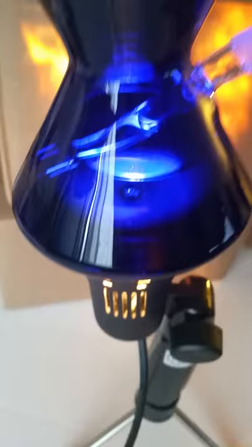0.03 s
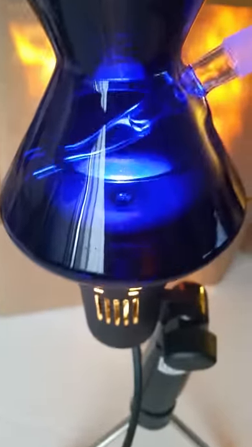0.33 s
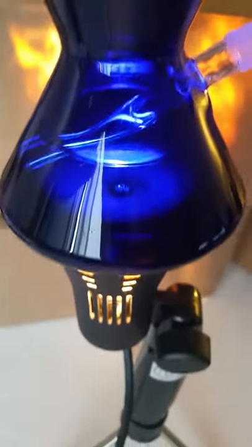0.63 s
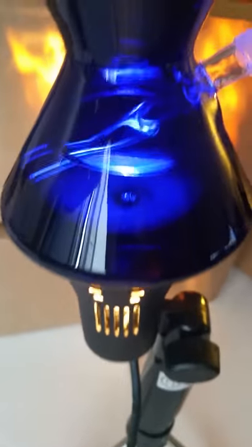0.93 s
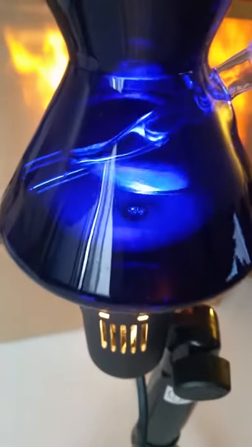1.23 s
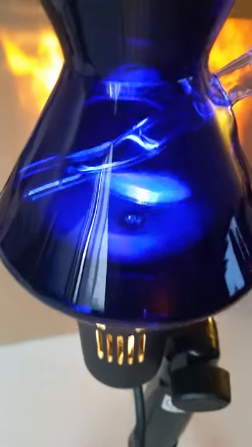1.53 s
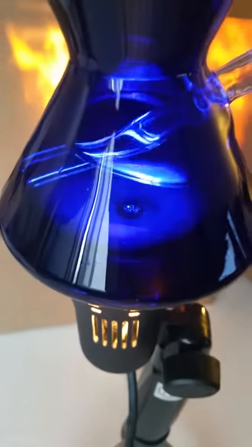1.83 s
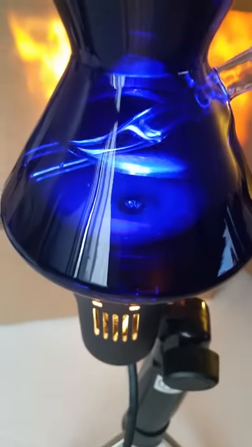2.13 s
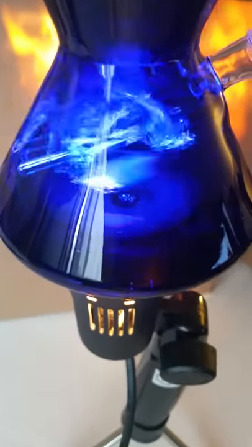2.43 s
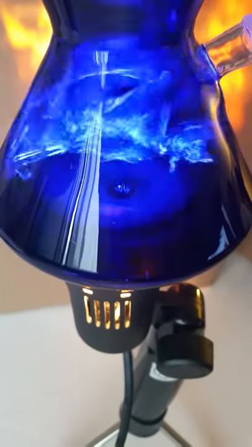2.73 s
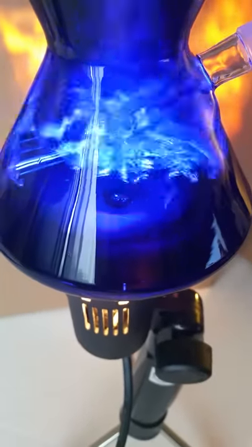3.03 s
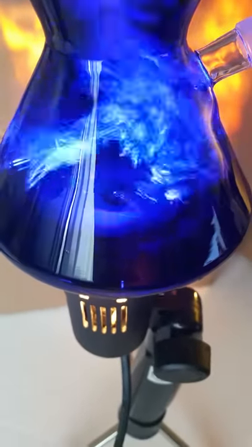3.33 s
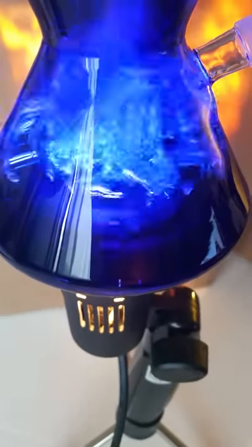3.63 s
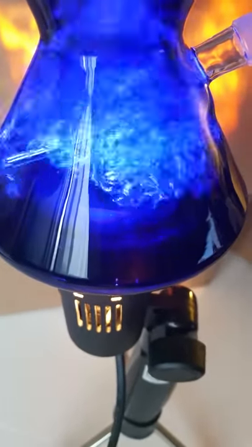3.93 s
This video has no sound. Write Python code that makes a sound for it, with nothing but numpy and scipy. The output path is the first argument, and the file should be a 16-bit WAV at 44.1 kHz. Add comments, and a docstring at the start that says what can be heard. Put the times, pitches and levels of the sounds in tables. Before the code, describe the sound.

A glass water pipe bubbles close to the microphone in a small room. For the first 2.4 seconds there is only a fan's steady low rumble and hum. Then air is drawn through the water, slightly left of centre: bubbles pop rapidly and ring the glass, larger pockets glug, and fine spray crackles. The bubbling grows fuller around 3 seconds and continues until the end at 4 seconds, the fan behind it.

```python
"""A small room with a fan rumbling and humming, a glass water pipe close to a stereo microphone.
After about two seconds air is drawn through the water: bubbles pop and ring the flask, larger pockets
glug, small bubbles churn and sing in between, and spray crackles on the glass.
The pipe sits left of centre; the fan runs behind it throughout."""
import sys
import numpy as np
from scipy import signal
from scipy.fft import rfft, irfft
from scipy.io import wavfile
from scipy.ndimage import uniform_filter1d

SR = 44100
rng = np.random.default_rng(int(sys.argv[2]) if len(sys.argv) > 2 else 0)


def bounce(signal):
    """Save signal as a 16-bit WAV file at the path given by the first command-line argument."""
    frames = np.transpose(np.atleast_2d(signal))
    limited = np.clip(frames, -1, 1)
    pcm = np.round(limited * 32767).astype(np.int16)
    wavfile.write(sys.argv[1], SR, pcm)


N = 176400
RIGHT_LAG_S = 0.00034  # the pipe's sound reaches the right channel later
DROP_RISE_CYCLES = 2.6


def undb(db):
    """Decibels to gain."""
    return 10 ** (np.asarray(db) / 20)


def unit(x):
    """Scale to an rms of 1."""
    return x / np.sqrt(np.mean(x ** 2))


def colour(x, points):
    """Filter by a curve of (freq_hz, gain_db) points."""
    hz, db = np.array(points, float).T
    freqs = np.maximum(np.fft.rfftfreq(N, 1 / SR), 1)
    return irfft(rfft(x) * undb(np.interp(np.log(freqs), np.log(hz), db)), N)


def walk(per_s):
    """A smooth random drift, rms 1."""
    hold = int(SR / per_s)
    steps = np.repeat(rng.standard_normal(N // hold + 1), hold)
    return unit(uniform_filter1d(steps, hold)[:N])


def add(track, start_s, sound):
    """Mix a sound into a track."""
    i = int(np.clip(start_s * SR, 0, N - 1))
    track[i:i + len(sound)] += sound[:N - i]


def ring(x, response):
    """Pass a sound through a left and a right impulse response."""
    return signal.fftconvolve(np.atleast_2d(x), response, axes=1)[:, :N]


def spread(x, right_db):
    """Place a sound in stereo, the right channel slightly late."""
    return np.array([x, undb(right_db) * np.roll(x, int(RIGHT_LAG_S * SR))])


def clicks(per_s, spread_db):
    """Random clicks of uneven size."""
    hits = (rng.random(N) < per_s / SR) * rng.choice([-1, 1], N)
    return hits * undb(spread_db * np.clip(rng.standard_normal(N), -2, 2))


def swarm(per_s):
    """Random bubbles as rows of start_s, pitch (0 to 1), strength (0 to 1)."""
    return rng.random((int(per_s * N / SR), 3)) * [N / SR, 1, 1]


def push(peak_s):
    """One smooth pulse of pressure, peak 1."""
    u = np.arange(SR // 100) / SR / peak_s
    return u * np.exp(1 - u)


def bubble(hz, rise_s, decay_s, glide_per_s=0.6):
    """A bubble's short ring, rising in pitch."""
    t = np.arange(int(SR * min(8 * decay_s + 3 * rise_s, .08)) + 8) / SR
    envelope = (1 - np.exp(-(t / rise_s) ** 2)) * np.exp(-t / decay_s)
    cycles = hz * t * (1 + glide_per_s * (t / 2 - decay_s))
    return -np.sin(2 * np.pi * cycles) * envelope / envelope.max()


# Bubbles popping close to the microphone, levels relative:
# start_s, level_db, pitch_hz, crack_db, rise_s, decay_s
BUBBLE_POPS = [(2.515,-30,1970,-34.5,0.001,.005), (2.587,-37,1600,-59,.006,0.026),
               (2.6438,-27,1250,-38,0.00027,.0015), (2.644,-27.5,1960,-30.5,.0005,0.0022),
               (2.691,-35,1630,-50,.0046,0.0058), (2.700,-35,2430,-55,0.0037,0.0076),
               (2.739,-19,1770,-25.5,0.00034,0.0056), (2.7394,-24.5,2740,-41,0.00027,0.0047),
               (2.773,-34,1720,-36,.002,.005), (2.796,-32,1740,-50,.003,0.0066),
               (2.822,-28.5,1720,-34,.002,.005), (2.8392,-12.5,1430,-37,0.00034,0.00043),
               (2.840,-31,1190,-30,.0005,0.0064), (2.8472,-30,1660,-34,.0003,.002),
               (2.892,-27,1720,-33,.0004,0.0049), (2.9756,-27.5,1200,-47,0.0003,.002),
               (2.9941,-21.5,1746,-33,0.0021,0.0056), (3.035,-36,2520,-50,0.0022,0.0051),
               (3.0929,-23,1780,-32,.001,.004), (3.104,-26.5,1630,-25.5,0.0019,0.0034),
               (3.187,-32,1630,-49,.0089,0.0093), (3.217,-25,1586,-55,0.0099,0.0096),
               (3.224,-35,2550,-55,0.0046,0.011), (3.2516,-11.5,1620,-34,0.00058,0.0023),
               (3.2852,-24,1650,-40,.0004,0.0024), (3.298,-14.5,1574,-47,0.0047,.0045),
               (3.3077,-11.5,1670,-20,0.00027,0.0035), (3.347,-24,1670,-45,.0018,.0045),
               (3.419,-26,1520,-56,.0041,0.0044), (3.4294,-12,1610,-24,0.00017,0.0033),
               (3.4488,-25,1690,-49,0.0047,.0056), (3.482,-22.5,1630,-22.5,0.00058,.0035),
               (3.5014,-40,1780,-30,.0009,.004), (3.583,-21,1790,-35,0.0023,.004),
               (3.586,-27,2370,-31,0.00079,0.0027), (3.6137,-29,1700,-25,.00085,0.0054),
               (3.615,-31,1186,-42,0.00046,.004), (3.675,-38,2710,-52,.004,0.014),
               (3.697,-15,1700,-26,0.0014,0.0033), (3.77,-20.5,1748,-23,.0028,0.0045),
               (3.789,-32,2660,-45,.002,0.0055), (3.83,-38,2600,-52,.003,0.0054),
               (3.8683,-29,1760,-21,.0012,.004), (3.93,-37,2420,-28,.002,0.0059),
               (3.9428,-21.5,1727,-36,0.00034,.003), (3.953,-24,1670,-48,0.0018,0.0042)]
# Colour of a bubble's crack: freq_hz, gain_db
CRACK_COLOUR = [(100, -37), (500, -5), (1200, -11.5), (2000, -4), (2900, -5.5), (3500, -6), (4400, -13),
                (6000, -9), (15000, -35)]


def pops(kick_s=0.00051, tear_s=0.0014):
    """Each bubble opens with a drop in pressure, rings briefly and cracks against the flask's modes."""
    t = np.arange(SR // 50) / SR
    tone, kick, crack = np.zeros((3, N))
    for start_s, db, hz, crack_db, rise_s, decay_s in BUBBLE_POPS:
        add(tone, start_s, undb(db + 6) * bubble(hz, rise_s, decay_s))
        add(kick, start_s, -undb(db - 4) * push(kick_s))
        tearing = undb(-16.5) * rng.standard_normal(len(t)) * np.exp(-t / tear_s)
        tearing[0] -= 1  # the sharp snap that starts the crack
        add(crack, start_s + kick_s, undb(crack_db + 18.5) * tearing)
    crack = colour(crack, CRACK_COLOUR)
    kick = signal.sosfilt(signal.butter(2, 150, "high", fs=SR, output="sos"), kick)
    right = undb(-14) * tone + undb(0.5) * crack
    late_right = np.interp(np.arange(N) - RIGHT_LAG_S * SR, np.arange(N), right)
    return np.array([tone + crack, late_right]) + kick + undb(-22) * flask(crack)


# Air modes of the flask, levels relative: pitch_hz, left_db, right_db, t60_s
FLASK_MODES = [(560, -30, -35.5, .03), (1000, -32, -3, 0.021), (1170, -4.5, -21, 0.099),
               (1390, -13.5, 4, 0.026), (1520, 6, -28.5, 0.033), (1714, 0.5, -19, 0.031),
               (1790, 8, 6, 0.058), (2070, -4, -45.5, 0.05), (2374, -27.5, 8, 0.017), (2657, 5, -1, 0.023),
               (2925, -10.5, 8.5, 0.014), (4060, -36, -13, 0.04), (4480, 1, 10.5, 0.0073)]


def flask(x):
    """The air in the flask rings; each mode reaches the two channels out of step."""
    t = np.arange(SR // 6) / SR
    arrived = np.maximum(t - np.array([[0], [RIGHT_LAG_S]]), 0)
    response = 0
    for hz, left_db, right_db, t60_s in FLASK_MODES:
        mode = np.sin(2 * np.pi * hz * arrived) * np.exp(-np.log(1000) * t / t60_s)
        response = response + undb([[left_db], [right_db]]) * mode
    return ring(x, response)


# Large air pockets leaving the stem, levels relative: start_s, level_db, pitch_hz
AIR_POCKETS = [(2.714, -33, 443), (2.738, -24.5, 630), (2.839, -29.5, 552), (2.893, -28, 508),
               (2.975, -34, 476), (3.001, -33, 560), (3.092, -24.5, 595), (3.101, -26, 525),
               (3.158, -26.5, 589), (3.284, -31, 445), (3.298, -30, 470), (3.348, -26.5, 544),
               (3.426, -30, 524), (3.479, -36, 430), (3.508, -28, 600), (3.582, -28, 540),
               (3.778, -26, 477), (3.871, -27.5, 510), (3.911, -22, 525), (3.951, -22, 513)]


def glugs(flow):
    """Large pockets glug; smaller ones gurgle at random while the air flows."""
    shape = dict(rise_s=0.0013, decay_s=0.0059, glide_per_s=2.4)
    big, small = np.zeros((2, N))
    for start_s, db, hz in AIR_POCKETS:
        add(big, start_s, undb(db + 8) * bubble(hz, **shape))
    for start_s, pitch, strength in swarm(per_s=86):
        add(small, start_s, undb(21 * strength) * bubble(280 * 2 ** (1.45 * pitch), **shape))
    return (big + undb(-43) * flow * unit(small)) * undb([[0], [-15]])


def churn(flow, puff_s=0.014):
    """Many soft puffs of air keep the flask ringing."""
    onsets = np.abs(clicks(per_s=220, spread_db=6.5))
    puffs = signal.fftconvolve(onsets, np.hanning(int(puff_s * SR) + 3), "same")
    return undb(-41.5) * flow * unit(flask(puffs * rng.standard_normal(N)))


# Bands of small bubbles between the pops: pitch_hz, spread_octaves, bubbles_per_s, level_db at unit flow
SINGING_BANDS = [(1630, 0.1, 110, -37.5), (2060, 0.218, 45, -44.5), (2620, 0.148, 80, -43.5),
                 (4210, 0.102, 70, -52.5)]


def singing(flow):
    """Small bubbles swell at random near the flask's resonances."""
    chorus = np.zeros(N)
    for centre_hz, octaves, per_s, db in SINGING_BANDS:
        voice = np.zeros(N)
        for start_s, pitch, strength in swarm(per_s):
            hz = centre_hz * 2 ** (octaves * (2 * pitch - 1))
            add(voice, start_s, undb(10 * strength) * bubble(hz, rise_s=0.0021, decay_s=0.0093))
        chorus += undb(db) * unit(voice)
    return flow * spread(chorus, right_db=-17)


def tiny_bubble(pitch, low_hz=3510, octaves=2.182):
    """The smaller the bubble, the higher and shorter its ring; pitch runs from 0 to 1."""
    hz = low_hz * 2 ** (octaves * pitch)
    return bubble(hz, rise_s=DROP_RISE_CYCLES / hz, decay_s=9 / hz)


# Splashes on the glass, levels relative: start_s, level_db
GLASS_SPLASHES = [(2.414,-35.5), (2.485,-28.5), (2.496,-42), (2.504,-40), (2.527,-44), (2.641,-28),
                  (2.710,-35), (2.811,-30), (2.84,-35), (2.975,-39), (2.991,-43), (3.04,-36), (3.083,-33),
                  (3.155,-30), (3.25,-28.5), (3.307,-34), (3.345,-34), (3.4535,-37), (3.483,-38),
                  (3.502,-37), (3.568,-28), (3.623,-28.5), (3.699,-32), (3.727,-32.5), (3.757,-33),
                  (3.771,-37), (3.842,-29.5), (3.872,-33), (3.913,-44), (3.93,-24)]


def splashes(flow, rise_s=0.003, fall_s=0.0055, bubbles_each=14):
    """Each splash throws a shower of tiny bubbles and swells a crackling mist that follows the flow."""
    t = np.arange(SR // 10) / SR
    envelope = (1 - np.exp(-(t / rise_s) ** 2)) * np.exp(-t / fall_s)
    bursts, showers = np.zeros((2, N))
    for start_s, db in GLASS_SPLASHES:
        onset_s = start_s - rise_s
        add(bursts, onset_s, undb(db + 3) * envelope)
        for when, pitch, faintness in rng.random((bubbles_each, 3)):
            delay_s = fall_s * (np.sqrt(when) - np.log(1 - when))
            add(showers, onset_s + delay_s, undb(db - 1.5 - 20 * faintness) * tiny_bubble(pitch))
    hiss = flow * undb(-44.5 + walk(per_s=50))
    mist = (bursts + hiss) * unit(clicks(per_s=5000, spread_db=6))
    return showers + mist


# Single droplets, levels relative: start_s, level_db, pitch_hz, tick_db
DROPLET_PINGS = [(0.182,-45,11000,8), (0.794,-54,12000,2), (2.504,-24.5,6900,-6), (2.508,-29,7750,-14),
                 (2.623,-40.5,7260,1), (2.644,-34.5,7730,1), (2.648,-38,8000,-2), (2.739,-27.5,7900,0),
                 (2.809,-25.5,7840,0), (2.834,-31,7500,-14), (2.839,-33.5,7560,14.5), (2.848,-33,7740,5),
                 (2.9802,-30,7960,-4), (2.994,-29,9930,2), (3.086,-29,7050,-6), (3.158,-23.5,10500,-11),
                 (3.248,-36,7310,-4), (3.308,-30,7870,0), (3.315,-30,3700,-20), (3.348,-25.5,8400,-10),
                 (3.455,-36,9840,7), (3.469,-39,7800,-8), (3.482,-28,8600,12), (3.509,-39,8400,-8),
                 (3.613,-29,7250,8), (3.621,-32,9300,-8), (3.626,-25,10640,-8), (3.66,-37,8570,-4),
                 (3.711,-37,8500,-8), (3.762,-37,7700,-6), (3.808,-32,7240,-10), (3.878,-37,8540,-2),
                 (3.912,-24,14500,-7), (3.948,-35,8450,-2)]


def droplets(tick_s=0.0005):
    """Each droplet ticks, then pings."""
    track = np.zeros(N)
    for start_s, db, hz, tick_db in DROPLET_PINGS:
        tick = push(tick_s) * rng.standard_normal(SR // 100)
        add(track, start_s - tick_s, undb(db + tick_db - 1.5) * tick)
        add(track, start_s, undb(db) * bubble(hz, rise_s=DROP_RISE_CYCLES / hz, decay_s=0.0016))
    return track


def fizz(flow):
    """Tiny bubbles, most of them faint, fizz thinly while the air flows."""
    track = np.zeros(N)
    for start_s, pitch, strength in swarm(per_s=170):
        add(track, start_s, undb(15 * strength ** 3) * tiny_bubble(pitch))
    return undb(-53) * flow * unit(track)


# Colour of the spray at the microphone: freq_hz, gain_db
SPRAY_COLOUR = [(1500, -2.5), (3000, -5.5), (4400, -10.5), (5300, -7.5), (6200, -11.5), (7400, 1),
                (8500, 2.5), (9400, -5.5), (10300, -2.5), (12000, -9.5), (15500, -14)]


def spray(flow, scatter_s=0.0038):
    """Splashes, droplets and fizz reach the microphone directly and scattered by the glass."""
    drops = splashes(flow) + droplets() + fizz(flow)
    t = np.arange(SR // 10) / SR
    scatter = rng.standard_normal((2, len(t))) * np.exp(-t / scatter_s)
    scatter /= np.linalg.norm(scatter, axis=1, keepdims=True)
    scattered = undb([[-1.5], [-8.5]]) * ring(drops, scatter)
    return colour(spread(drops, right_db=-5) + scattered, SPRAY_COLOUR)


def room(x, t60_s=0.33, gap_s=0.004):
    """The small room adds a short tail, well below the close sound."""
    t = np.arange(SR // 2) / SR
    tail = rng.standard_normal((2, len(t))) * np.exp(-np.log(1000) * t / t60_s) * (t > gap_s)
    tail /= np.linalg.norm(tail, axis=1, keepdims=True)
    return x + undb(-20) * ring(x[0], tail)


# Tones of the fan: pitch_hz, level_db, wander_hz
HUM_TONES = [(59.4, -56, 1.4), (121, -40.5, 2.77), (174.3, -37, 1.43), (365.4, -48, 1.43),
             (899.6, -53.5, 11.98), (1144, -59.5, 5.3), (1220, -64, 12.16)]


def fan_hum(flutter_db=2.5):
    """The fan hums in a few tones that waver in level and pitch."""
    hum = np.zeros(N)
    for hz, db, wander_hz in HUM_TONES:
        amplitude = np.sqrt(2) * undb(db + flutter_db * walk(per_s=11))
        cycles = np.cumsum(hz + wander_hz * walk(per_s=40)) / SR
        hum += amplitude * np.sin(2 * np.pi * cycles)
    return hum


# Colour of the fan's noise: freq_hz, gain_db
FAN_COLOUR = [(15,-40), (30,-31), (45,-21), (70,-19.5), (92,-7.5), (115,-6.5), (140,0.5), (165,-1.5),
              (190,-9), (225,-9.5), (330,-12), (430,-11.5), (530,-11.5), (680,-15.5), (800,-20),
              (920,-20.5), (1020,-25.5), (1180,-26.5), (1410,-30.5), (1600,-30.5), (1780,-31.5),
              (2050,-29.5), (2350,-34), (2700,-32.5), (3100,-36), (3450,-35.5), (3900,-41), (4400,-42.5),
              (5500,-49), (6700,-51.5), (7600,-44), (9500,-48), (12000,-53), (15500,-63)]
# Its stereo width, side against mid: freq_hz, side_db
FAN_WIDTH = [(60, -3), (110, -37), (200, -12.5), (380, -10.5), (700, -5), (1290, 2), (2380, -0.5),
             (4400, 2), (8120, 0), (15000, 1.5)]
# Its balance at the microphone: freq_hz, left_minus_right_db
FAN_BALANCE = [(60, 4), (110, 1), (200, -0.5), (380, 2.5), (700, 1), (1290, 2), (2380, 0), (4400, -5),
               (8120, 3.5), (15000, -4.5)]


def fan(level_db=-32.5):
    """The fan rumbles, hisses and hums steadily in the background."""
    mid, side = (unit(colour(rng.standard_normal(N), FAN_COLOUR)) for _ in range(2))
    side = colour(side, FAN_WIDTH)
    hum = fan_hum()
    channels = []
    for sign in (1, -1):  # left, right
        air = undb(level_db) * (mid + sign * side)
        lean = [(hz, sign * db / 2) for hz, db in FAN_BALANCE]
        channels.append(colour(air + hum, lean))
    return np.array(channels)


# Flow of air drawn through the water: time_s, level_db
AIR_FLOW = [(2.3, -39), (2.41, -15), (2.49, 2.5), (2.56, -13), (2.7, -3.5), (3.0, -1.5), (3.25, 0.5),
            (3.6, 0.5), (4.0, 1.5)]


def scene():
    """The bubbling pipe close up, the fan behind it."""
    times_s, flow_db = np.array(AIR_FLOW).T
    flow = undb(np.interp(np.arange(N) / SR, times_s, flow_db))
    pipe = pops() + glugs(flow) + churn(flow) + singing(flow) + spray(flow)
    return room(pipe) + fan()


def record(dry):
    """The microphone opens after a moment, rounds the loudest peaks and cuts the top."""
    open_s, fade_s, top_hz = 0.072, 0.014, 15800
    opened = np.clip((np.arange(N) / SR - open_s) / fade_s, 0, 1)
    rounded = np.tanh(1.05 * dry) / 1.125
    lowpass = signal.ellip(10, .2, 80, top_hz, fs=SR, output="sos")
    return signal.sosfilt(lowpass, opened * rounded)


dry = scene()
out = record(dry)
bounce(out)
```